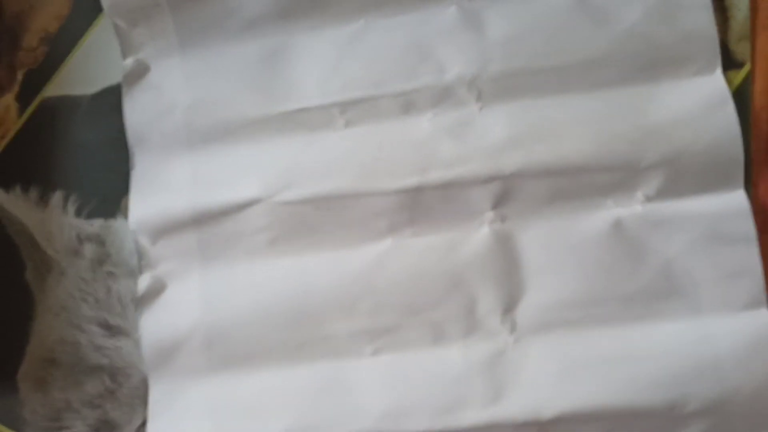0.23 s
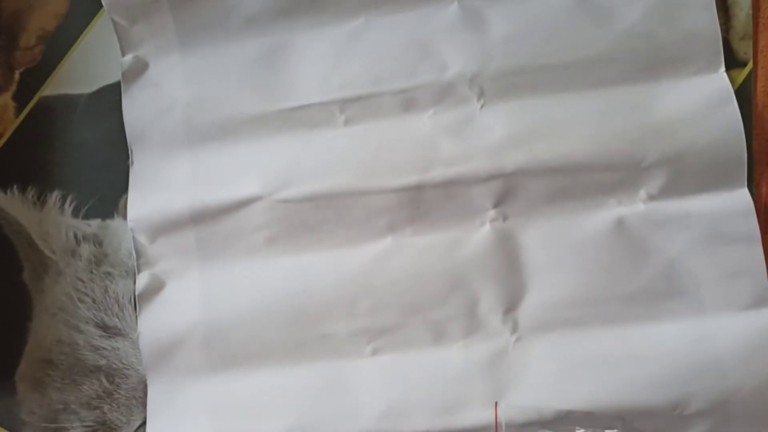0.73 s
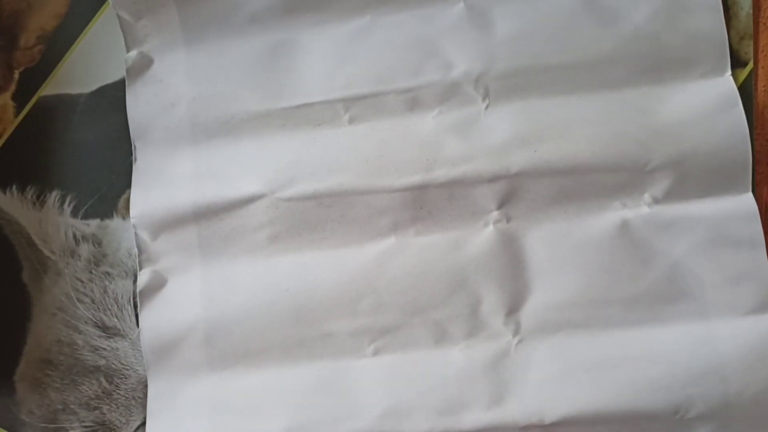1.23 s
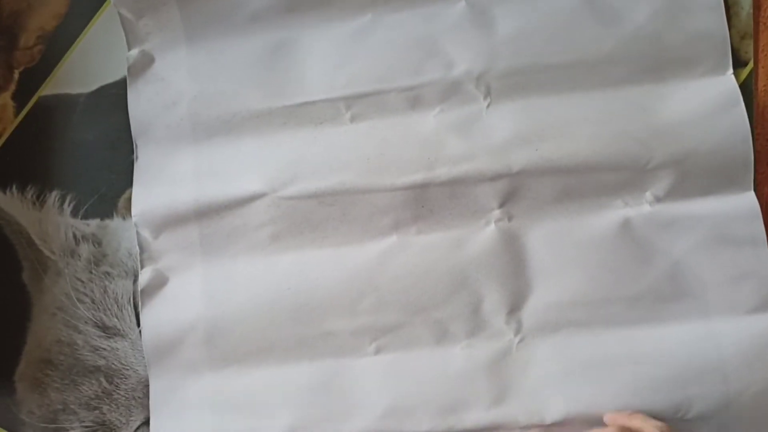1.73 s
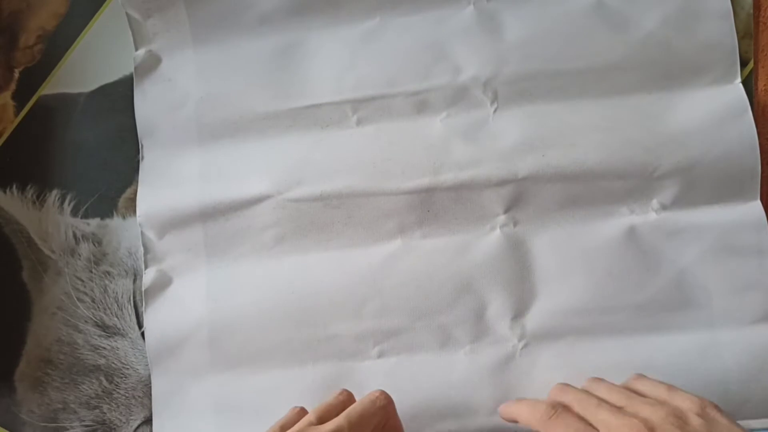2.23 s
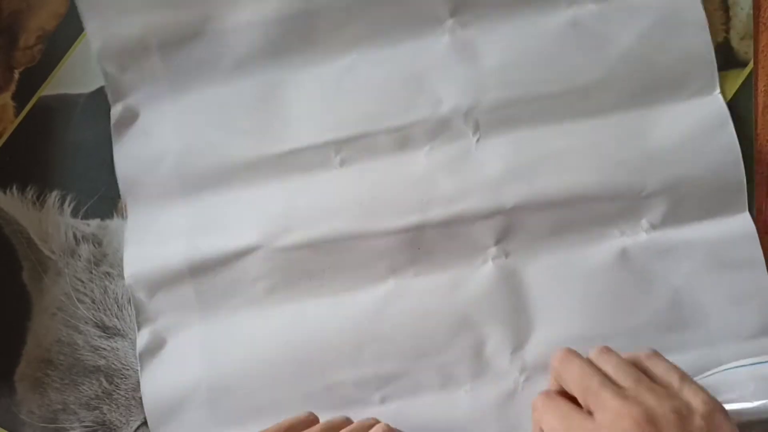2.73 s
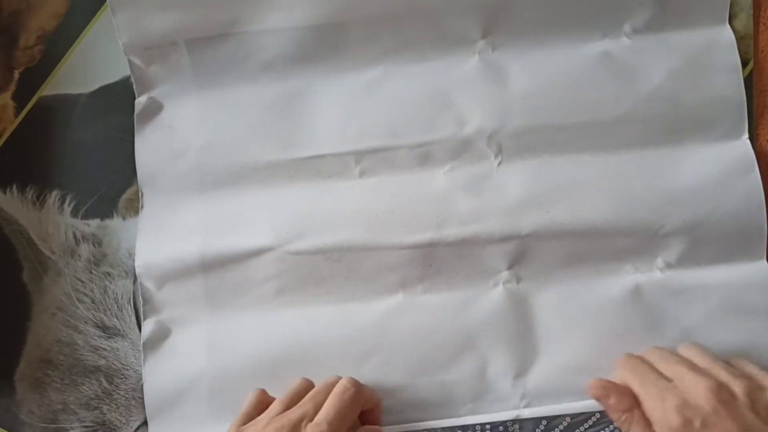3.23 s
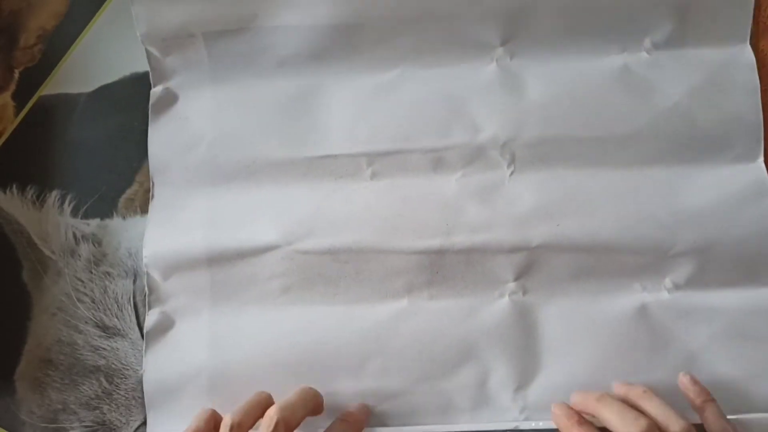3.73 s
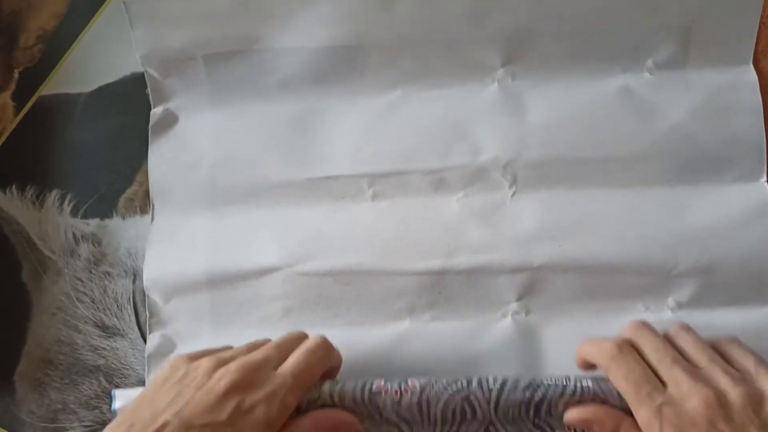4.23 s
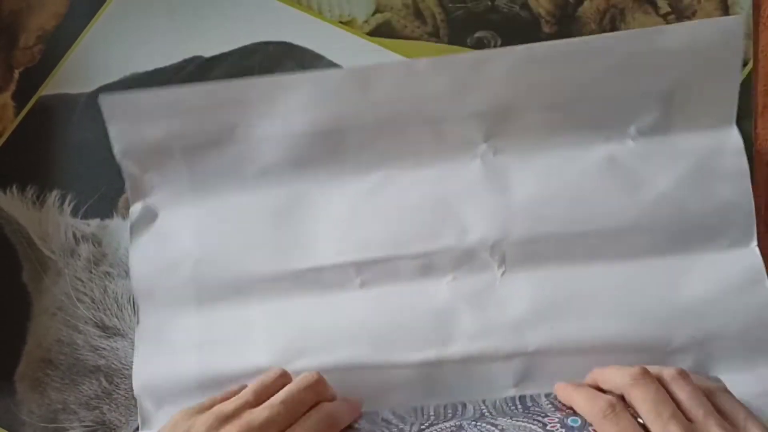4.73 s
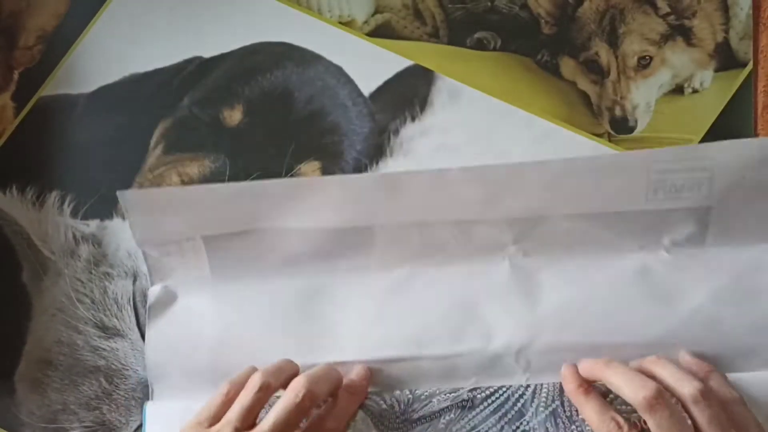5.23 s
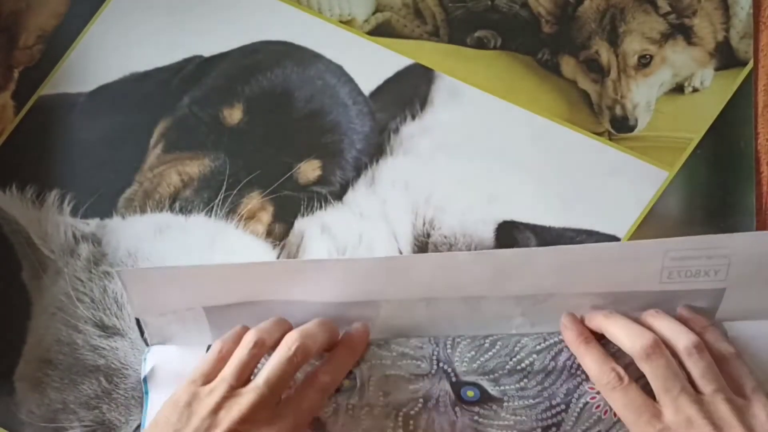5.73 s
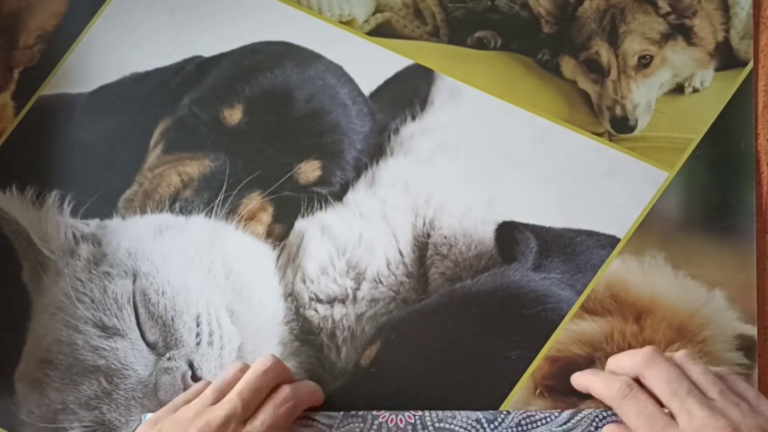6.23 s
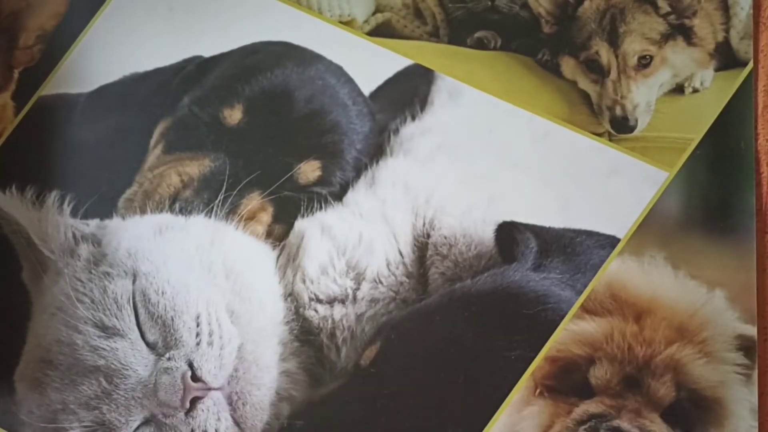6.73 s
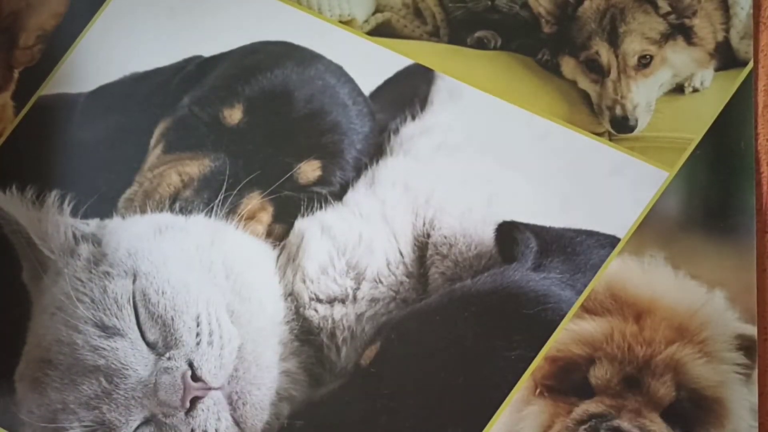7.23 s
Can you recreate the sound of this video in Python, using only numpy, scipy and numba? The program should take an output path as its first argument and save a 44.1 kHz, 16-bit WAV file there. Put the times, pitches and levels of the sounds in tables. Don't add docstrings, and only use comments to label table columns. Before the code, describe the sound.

Close, dry crackling and crunching of a large stiff paper-like sheet being gripped and rolled up on a table, with hollow pops and sharp creases.

```python
import sys
import numpy as np
from scipy import signal
from scipy.fft import rfft, irfft, next_fast_len
from scipy.io import wavfile
from scipy.ndimage import uniform_filter1d, map_coordinates
from numba import njit

SR = 44100
rng = np.random.default_rng(int(sys.argv[2]) if len(sys.argv) > 2 else 0)


def gain_from_db(level_db):
    decades = np.asarray(level_db, float) / 20
    return 10 ** decades


def store_wav(level_fs):
    pcm = np.round(np.clip(np.atleast_2d(level_fs), -1, 1) * 32767)
    wavfile.write(sys.argv[1], SR, pcm.T.astype(np.int16))


N = 330309

# peak in seconds, rise in seconds,
# fall in seconds, strength in dB, sliding over buckling in dB.
MOVES = [(.0, .02, 0.13, -47, 5), (.09, 0.0072, 0.063, -41.5, 14.5), (0.23, 0.013, 0.095, -41, 10),
         (.42, 0.21, 0.43, -46.5, 5.5), (.63, 0.05, 0.058, -39.5, 6), (.736, 0.049, 0.066, -47.5, 3),
         (1.047, 0.022, 0.17, -44, 5.5), (1.23, 0.013, 0.025, -36.5, -3),
         (1.336, 0.014, 0.051, -39.5, -2), (1.43, 0.044, 0.041, -51, -14),
         (1.583, 0.062, 0.038, -36, -1), (1.7, 0.29, 0.036, -48, 5), (1.84, 0.14, 0.21, -38.5, -2.5),
         (2.105, 0.11, 0.13, -38.5, 1.5), (2.04, 0.052, .05, -42, 0), (2.251, 0.016, 0.049, -42.5, 9),
         (2.4, 0.14, 0.13, -47, -7), (2.592, 0.073, 0.084, -37.5, 0.5),
         (2.77, 0.085, 0.084, -41.5, 5.5), (2.89, 0.56, 0.04, -49, -11),
         (3.19, 0.31, 0.11, -47, -5.5), (3.234, 0.0067, 0.028, -29.5, -4),
              (3.265, 0.042, 0.11, -41, -3.5), (3.41, 0.25, 0.015, -48.5, -13),
              (3.48, 0.04, 0.088, -42.5, -7.5), (3.615, 0.034, 0.079, -40.5, -0.5),
              (3.767, 0.023, 0.026, -41, -11), (3.847, 0.064, 0.021, -42, -1.5),
              (4.22, 0.34, 0.34, -43.5, 2.5), (4.419, 0.058, 0.031, -43, 1),
              (4.79, 0.078, 0.14, -42.5, 2.5), (4.89, 0.056, 0.031, -48, -1),
              (5.005, 0.061, 0.068, -40.5, 0), (5.1, 0.03, 0.02, -47.5, -16),
              (5.291, 0.1, 0.042, -50.5, -10.5), (5.39, 0.043, 0.13, -48, 4.5),
              (5.72, 0.38, 0.2, -60.5, -11), (5.84, 0.041, 0.03, -57.5, 21), (5.94, 0.051, 0.07, -53, -10),
              (6.06, 0.03, 0.052, -46, 7), (6.13, 0.063, 0.1, -48, 25), (6.26, 0.11, 0.077, -57.5, -10),
              (6.605, 0.075, 0.15, -46, 0), (6.765, 0.071, 0.074, -52, 6), (7.2, 0.36, 0.084, -64.5, 7)]
# time in seconds, strength in dB, sliding over buckling in dB.
CREEP = [(0, -63.5, -14), (.9, -51, 8), (2.5, -52.5, 2), (3.05, -55.5, 5), (4.58, -53.5, -11.5),
         (5.6, -61, 14), (6.4, -67, -4), (7.49, -82, 6)]
# time in seconds, fibre drag in dB, slack in dB.
HOLD = [(0, 5, -1), (.45, 3.5, 1), (.8, 0.7, -7), (1.1, 5.5, 3.5), (1.6, 3, -4.5), (1.85, -1, -5),
        (2.1, 4, -4.5), (2.6, -2, -2), (3.2, -8, -7.5), (3.6, -0.5, 0), (3.9, -2, -1.5), (4.2, -11, 1),
        (4.6, -2.5, -2), (5.0, 2, -0.5), (5.4, -2, 4.5), (5.9, 2, 4), (6.4, 3, 6.5), (7.1, -4, 0)]
# peak in seconds, peak level in dB.
FLAPS = [(1.175, -45), (2.041, -36), (4.2, -57), (5.72, -57.5), (6.05, -57), (6.27, -60.5), (6.56, -58)]
# frequency in Hz, density in dB per Hz.
SLIDE_SPECTRUM = [(300, -28), (1500, -4), (3000, -3.5), (8000, -6), (17000, -9.5)]
# start in seconds, peak in dB, pitch in Hz,
# rise in ms.
POPS = [(0.0814, -20.5, 1920, 0.47), (0.2302, -23.5, 1970, 4.1), (0.2797, -26.5, 2090, 0.56),
        (0.442, -23.5, 1820, 1.24), (0.581, -21, 2170, 0.6), (0.654, -24, 1430, 2.7),
        (1.0813, -25.5, 1580, 2), (1.1402, -21.5, 1440, 0.63), (1.1665, -21, 1340, 4.1),
        (1.2267, -28, 1270, 1.46), (1.3213, -19.5, 1820, 0.74), (1.5709, -19, 940, 1.02),
        (1.6454, -25, 1130, 1.14), (1.876, -26, 1370, 0.97), (1.9547, -27.5, 1300, 7.9),
        (1.9927, -24.5, 1270, 1.66), (2.0121, -20.5, 1040, 2.4), (2.022, -14, 1270, 1.8),
        (2.037, -15, 1100, 1.55), (2.0465, -13.5, 1310, 5.4), (2.065, -15, 1160, 1.84),
        (2.083, -16, 1036, 2.05), (2.1391, -22.5, 1250, 1.9), (2.1502, -16, 1190, 1.03),
        (2.201, -22, 930, 1.47), (2.2431, -21, 1080, 2.2), (2.3542, -23.5, 2160, 2.7),
        (2.3906, -25, 1220, 2.15), (2.5532, -22.5, 1340, 1.2), (2.6032, -25, 1240, 3.6),
        (2.6912, -18.5, 1980, 0.45), (2.79, -24.5, 1540, 1.1), (2.854, -28, 1230, 0.73),
             (2.886, -23, 1380, 5.5), (2.9009, -25, 1120, 1.86), (3.0372, -27.5, 1350, 1.8),
             (3.2096, -23, 1510, 1.3), (3.2318, -7, 1240, 2.66), (3.2397, -17, 1360, 3.8),
             (3.3205, -21, 1010, 1.95), (3.5012, -28.5, 1170, 3.5), (3.8237, -34, 2040, 1.5),
             (3.9488, -20.5, 1060, 1.6), (4.1377, -27.5, 980, 0.49), (4.2434, -26, 980, 1.42),
             (4.259, -25.5, 1070, 0.56), (4.292, -32, 2550, 5.2), (4.344, -22, 1050, 1.25),
             (5.1, -28, 1680, 6.8), (5.1858, -34, 1540, 1.2), (5.293, -34, 1420, 1.1),
             (5.3356, -31, 1200, 1.13), (5.6836, -38, 1300, 2.3), (5.7914, -29.5, 1270, 0.61),
             (5.917, -30, 1180, 1.5), (6.139, -33, 2070, 0.36), (6.3297, -35.5, 834, 0.5),
             (6.9626, -39, 890, 0.72), (7.3528, -45, 790, 1.3)]
# start in seconds, peak in dB, pitch in Hz,
# rise in ms.
MORE_POPS = [(0.204, -34, 2000, 1.2), (0.249, -37, 1760, 1), (0.342, -31, 2150, 1.2),
             (0.489, -27.5, 1880, 1.1), (0.601, -32, 1150, 0.87), (0.611, -26, 1230, 1.2),
             (0.665, -23, 2130, 1.3), (0.774, -31.5, 1850, 1.4), (0.855, -33.5, 1800, 1.5),
             (1.07, -31, 1610, 0.64), (1.116, -29, 1000, 1.04), (1.219, -25, 1330, 1.24),
             (1.266, -28, 1780, 0.89), (1.339, -19.5, 1440, 1.46), (1.539, -28, 1280, 0.61),
             (1.579, -19.5, 1040, 1.2), (1.844, -24, 1280, 1.1), (2.094, -21, 1530, 1.5),
             (2.119, -23, 1010, 1.3), (2.193, -29.5, 900, 0.92), (2.457, -30, 2060, 1.5),
             (2.506, -32.5, 1070, 1), (2.623, -32, 1170, 1.1), (2.842, -25, 1490, 0.58),
             (3.156, -32, 1450, 1.6), (3.2146, -29, 1250, 1.63), (3.2287, -12, 1250, 1.77),
             (3.398, -28, 970, 1.1), (3.596, -35, 980, 1.3), (3.919, -28.5, 1200, 1.4),
             (3.987, -32.5, 1970, 1.1), (4.28, -31, 1140, 1.4), (4.331, -31, 1080, 1.25),
             (4.482, -31, 2140, 1.7), (4.648, -37, 1119, 1.2), (4.736, -34, 1910, 0.82),
             (5.361, -38, 1670, 1.2), (5.895, -36, 1170, 1.2), (6.024, -42.5, 746, 1.5),
             (6.042, -32.5, 1940, 1.1), (6.49, -46, 636, 1.05), (6.518, -42, 676, 1.6),
             (6.863, -44.5, 720, 1.3), (6.938, -48, 732, 0.96)]
# start in seconds, peak in dB, pitch in Hz, rise in ms.
BUMPS = [(1.39, -36, 129, 7.5), (1.855, -33.5, 182, 6.5), (3.994, -36, 167, 8.5)]
# start in seconds, peak in dB, pitch in Hz, rise in ms.
MORE_BUMPS = [(.265, -40, 139, 8), (.49, -43, 230, 8.7), (1.169, -35.5, 314, 3.9), (1.929, -46, 112, 11),
              (4.3, -40, 110, 7.5), (5.9, -48, 302, 6.2), (6.38, -50, 320, 5)]
# start in seconds, peak in dB, left over
# right in dB.
SNAPS = [(0.0015, -31.5, -9), (0.028, -35, 8), (0.04, -30, -5), (0.0807, -26, 0), (0.2321, -25.5, -3),
         (0.2398, -24.5, -2.5), (0.2965, -30, 7), (0.302, -23.5, -4), (0.392, -30, 3),
         (0.4254, -25, -5), (0.441, -30, 4), (0.4644, -26, -3), (0.582, -30, -4), (0.6533, -26.5, -3),
         (0.6582, -31, 6), (0.7385, -25, -5), (0.855, -38.5, 12), (1.1658, -32, 8),
         (1.2663, -31.0, -1), (1.3151, -29, -3), (1.321, -33, -3), (1.335, -26.5, -4),
         (1.3745, -30.5, 2), (1.5895, -34.5, -1), (1.5417, -24, -6), (1.875, -27, 3),
         (2.0271, -30, -1), (2.0842, -30, 5), (2.138, -22, -3), (2.1977, -26, 0), (2.6915, -30.5, -7),
         (2.887, -33, 1), (3.23, -29, 13), (3.892, -39, -4), (3.969, -36, 2), (3.9773, -35, -8),
              (4.004, -33.5, 3), (4.027, -42, -6), (4.049, -32, 1), (4.11, -33, 5), (4.1327, -29.5, 0),
              (4.155, -24, 0), (4.1865, -29, 3), (4.211, -29.5, 6), (4.238, -33, 11), (4.261, -27.5, 1),
              (4.293, -31.5, 4), (4.657, -40, -2), (4.671, -39.5, 5), (4.7062, -40, -2), (5.195, -39, 3),
              (5.6085, -45, -10), (6.94, -48, 4)]
# start in seconds, peak in dB, left over right
# in dB.
MORE_SNAPS = [(0.2055, -29, -1.5), (0.2504, -33, -3), (0.3795, -25, -2), (0.5177, -30, -1.5), (0.5437, -31, 6),
              (0.602, -32, -2.0), (0.6114, -30, 0.0), (0.695, -27, -1.0), (0.7253, -20, -1), (0.7665, -24.5, -1),
              (1.0718, -20, -2), (1.2047, -31, 0.5), (1.2494, -30, 8), (1.5184, -25, 7), (1.5584, -30, -1),
              (1.6452, -26.5, 5), (1.7318, -28, 15), (1.7789, -32, -0.5), (1.8024, -24, 2), (2.0364, -15, -0.5),
              (2.0515, -19, -2.5), (2.0654, -25, 0.0), (2.1216, -22, -4.5), (2.232, -26, 1), (2.2613, -29, -7),
              (2.3256, -29, -1.5), (2.3875, -30, 4), (2.4262, -30, 3), (2.584, -22.5, -13), (2.7097, -31, 0.5),
              (2.7706, -21, 2), (2.8436, -29, -1.5), (3.209, -30, -3), (3.2148, -33, -6), (3.4422, -27.5, -9),
              (3.5389, -29, -3), (3.577, -29, -5), (3.7658, -32, 0), (4.0935, -28, -2.0), (4.0764, -33, -3.5),
              (4.222, -22, -1), (4.372, -31, -6), (4.7356, -33, -7), (5.0374, -36, -5), (5.232, -37, -9),
              (5.289, -36, -13), (5.685, -37, -7), (5.9988, -37.5, -4), (6.3265, -38, -5), (6.489, -43, -4),
              (7.352, -49, -2)]
# start in seconds, peak in dB.
SPIKES = [(0.0797, -20), (0.4244, -27), (0.4412, -20), (0.58, -27), (1.3204, -18), (1.5417, -22),
          (2.0263, -21), (4.1316, -15.5), (4.7062, -35), (5.6087, -23.5), (6.9397, -31)]
# middle in seconds, length in seconds,
# start pitch in Hz, end pitch in Hz, level in dB.
RUBS = [(1.05, 0.053, 1250, 1200, -39), (1.43, 0.059, 1210, 1200, -35.5), (3.62, 0.037, 1070, 905, -45),
        (3.77, 0.031, 2060, 2200, -43), (3.845, 0.051, 2090, 2160, -33), (4.42, 0.044, 1040, 860, -35.5),
        (4.428, 0.044, 2170, 1250, -35.5), (6.635, 0.05, 1810, 1200, -47), (6.69, .045, 1100, 770, -53),
        (5.035, 0.055, 1650, 1780, -34.5), (6.14, 0.038, 2100, 2340, -42.5), (6.555, 0.12, 470, 776, -51.5),
        (6.6, 0.048, 1680, 2230, -42), (6.74, 0.092, 910, 1300, -45)]
# start in seconds, length in seconds,
# start pitch in Hz, end pitch in Hz, level in dB.
SQUEAKS = [
    (4.967, 0.024, 875, 900, -36),
    (4.989, 0.024, 1002, 1060, -34),
]
# multiple of the pitch, level in dB.
SQUEAK_TONES = [(1, 0), (2, -1.5), (3, -9)]
# frequency in Hz, width in Hz, boost in dB.
TABLE_MODES = [(331.5, 16, 2), (423, 14, 3.5), (719, 7.5, 0.5)]
# frequency in Hz, time to fall 60 dB in seconds.
ROOM_DECAY = [(200, 0.26), (1500, 0.37), (6000, 0.11), (15000, 0.16)]
# frequency in Hz, density in dB per Hz.
HUM_SPECTRUM = [(15, -68), (25, -29), (53, -21.5), (74, -7), (97, -1.5), (161, -2.5), (217, -7.5),
                (5000, -34), (14000, -36)]
# frequency in Hz, response in dB.
LEFT_PORT = [(30, -3), (100, -6), (3550, 1.5), (3800, -2), (5000, -2.5), (6800, 4.5), (6950, -1.5),
             (7500, 3), (9500, -3), (11500, -9), (11700, -4), (15600, -7.5)]
# frequency in Hz, response in dB.
RIGHT_PORT = [(30, 2), (100, -4.5), (3500, -0.5), (3800, -3.5), (6800, -2), (6950, -7.5), (9000, -5.5),
              (11500, 2), (11700, 8.5), (13500, 5), (15600, -1)]


def rustle():
    flapping, crunching, scraping, sliding = effort()
    jerk_db = .8 * wobble(45, np.arange(N) / SR)
    flap = grains(jerk_db, count=2500, centre_hz=383.0, spread=0.39, drift=0.044, cycles=1.1,
                  scatter_db=2.0, clump_db=0.8, width_s=6e-5)
    crunch = grains(jerk_db, count=3200, centre_hz=1200, spread=0.23, drift=0.1, cycles=2.74,
                    scatter_db=2, clump_db=3.0, width_s=9e-5)
    scrape = grains(jerk_db, count=8000, centre_hz=2360, spread=0.237, drift=0.095, cycles=5.5,
                    scatter_db=3.5, clump_db=2.5, width_s=1.2e-4)
    crackle = grains(jerk_db, count=24000, centre_hz=9800, spread=0.467, drift=0.033, cycles=4.6,
                     scatter_db=9.0, clump_db=2.0, width_s=0.0001)
    ticks = grains(jerk_db, count=2500, centre_hz=2450, spread=0.56, drift=0.027, cycles=0.56,
                   scatter_db=5.0, clump_db=0.0, width_s=0.0001)
    hiss = unit(gain_from_db(jerk_db) * rush(SLIDE_SPECTRUM, alike=0.24, patchy_db=2.5))
    buckling = gain_from_db(-0.5) * flapping * flap + gain_from_db(-2.5) * crunching * crunch
    fibres = gain_from_db(-3.0) * scraping * (scrape + gain_from_db(-2.5) * ticks)
    return buckling + fibres + sliding * (gain_from_db(-0.5) * hiss + gain_from_db(-6.5) * crackle)


def effort():
    t = np.arange(0, N / SR + .002, .002)
    s, rise_s, fall_s, db, slides_db = np.transpose(MOVES)
    creep_db, creep_slides_db = read_columns(CREEP, t)

    def strength(share):
        moving = moves(t, s, rise_s, fall_s, db + share * slides_db)
        return np.hypot(moving, gain_from_db(creep_db + share * creep_slides_db))

    crunch, scrape, slide = strength(-.55), strength(-.1), strength(.45)
    flap_s, flap_db = np.transpose(FLAPS)
    swings = moves(t, flap_s, 0.049, 0.068, flap_db)
    flap = np.hypot(swings, gain_from_db(-12.5) * uniform_filter1d(crunch, size=60))
    drag, slack = [gain_from_db(column_db) for column_db in read_columns(HOLD, t)]
    return [np.interp(np.arange(N) / SR, t, g) for g in (slack * flap, crunch, drag * scrape, slide)]


def moves(t, peak_s, rise_s, fall_s, db):
    late = t - peak_s[:, None]
    loss = np.where(late < 0, -late / np.abs(rise_s)[..., None], late / np.abs(fall_s)[..., None])
    level_db = db[:, None] - 12 * loss ** 1.28
    return np.sqrt(np.sum(gain_from_db(level_db) ** 2, axis=0))


def grains(jerk_db, count, centre_hz, spread, drift, cycles, scatter_db, clump_db, width_s):
    s = rng.uniform(0, N / SR, count)
    z = rng.standard_normal((count, 3))
    size_db = scatter_db * np.minimum(rng.exponential(1, count), 3)
    gain = gain_from_db(size_db + clump_db * wobble(40, s) + jerk_db[(s * SR).astype(int)])
    tension = spread * z[:, 0] + drift * wobble(20, s)
    hz = np.clip(centre_hz * np.exp(tension), 60, .4 * SR)
    side = 0.53 * wobble(12, s) + 1.0 * z[:, 1]
    gain *= np.sign(z[:, 2]) * np.sqrt(hz / centre_hz)
    lag_s = np.clip(width_s * side, -3e-4, 3e-4)
    return unit(rings(s, gain, hz, cycles, 0.35, 27000 * width_s * side, lag_s))


def pops(rows, gain_db, count=7):
    s, db, hz, rise_ms = np.transpose(rows)
    db = db + gain_db
    side = rng.standard_normal(len(s))
    swell_cycles = np.maximum(0.00062 * rise_ms * hz, .3)
    ring = rings(s, gain_from_db(db - 4.5), hz, 2.3, swell_cycles, 1.8 * side, 4e-5 * side)
    thump = rings(s, gain_from_db(db - 25.0), 0.36 * hz, 1.0, 0.2, 0.296 * side, 0 * side)

    s, db, hz, rise_ms, side = np.repeat([s, db, hz, rise_ms, side], count, axis=1)
    z = rng.standard_normal((len(s), 3))
    late_s = rng.uniform(0, 1, len(s)) ** 1.436 * (0.00148 + 0.00114 * rise_ms)
    pitch = np.clip(1.45 * hz * np.exp(.55 * z[:, 0]), 520, .3 * SR)
    gain = gain_from_db(db - 12.0 + 4.14 * z[:, 1] - 1.05 * abs(np.log2(pitch / hz)))
    spray = rings(s + late_s, gain, pitch, 1.9, 0.3, 7.1 * side + 1.5 * z[:, 2], 4e-5 * (side + z[:, 2]))
    return ring + thump + spray


def snaps(rows, gain_db, lean_db):
    out = np.zeros((2, N + SR))
    t = np.arange(SR // 20) / SR
    shape = (1 - np.exp(-t / 0.00019)) * (gain_from_db(-60 * t / 0.0048) + gain_from_db(-18 - 60 * t / 0.069))
    for s, db, pan_db in rows:
        common = rng.standard_normal(len(t))
        apart = rng.standard_normal((2, len(t)))
        gain = gain_from_db(db + gain_db + (pan_db + lean_db) * np.array([[.5], [-.5]]))
        start = round(s * SR)
        out[:, start:start + len(t)] += gain * shape * (0.54 * common + 1.71 * apart)
    return signal.sosfilt(signal.butter(4, 3600 / SR * 2, "high", output="sos"), out[:, :N])


def spikes():
    s, db = np.transpose(SPIKES)
    return rings(s, gain_from_db(db + 2.0), 8500 + 0 * s, 0.96, 0.41, 0 * s, 0 * s)


def rubs(count=24):
    middle, length, start_hz, end_hz, db = np.repeat(RUBS, count, axis=0).T
    part = rng.uniform(0, 1, len(db))
    z = rng.standard_normal((len(db), 3))
    hz = (start_hz + part * (end_hz - start_hz)) * np.exp((0.024 + 0.73 * length) * z[:, 0])
    gain = gain_from_db(db + 1.5 * z[:, 1]) * np.sin(np.pi * part)
    return rings(middle + length * (part - .55), gain, hz, 5.0, 2.0, 2.3 * z[:, 2], 4e-5 * z[:, 2])


def squeaks():
    out, t = np.zeros(N), np.arange(N) / SR
    waver, flutter_db = 0.036 * wobble(70, t), 1.8 * wobble(66, t)
    for s, length, start_hz, end_hz, db in SQUEAKS:
        on = (t > s) & (t < s + length)
        part = (t[on] - s) / length
        hz = (start_hz + part * (end_hz - start_hz)) * (1 + waver[on])
        phase = 2 * np.pi * np.cumsum(hz) / SR
        tone = sum(gain_from_db(tone_db) * np.sin(k * phase) for k, tone_db in SQUEAK_TONES)
        out[on] += gain_from_db(db + flutter_db[on]) * np.sin(np.pi * part) ** 0.38 * tone
    return out * gain_from_db([[.6], [-.6]])


def on_table(x):
    def response(f):
        modes = sum(gain_from_db(db) * 1j * f * w / (c * c - f * f + 1j * f * w) for c, w, db in TABLE_MODES)
        return (1 + modes) * (1j * f / (1j * f + 110)) ** 2
    return filtered(x, response)


def room(x):
    hz, t, z = signal.stft(rng.standard_normal((2, SR // 3)), SR, nperseg=256)
    fade = gain_from_db(-60 * t / along(ROOM_DECAY, hz)[:, None])
    tail = signal.istft(z * fade, SR, nperseg=256)[1]
    delayed = np.pad(x, ((0, 0), (130, 0)))
    return signal.fftconvolve(delayed, tail / np.linalg.norm(tail[0]), axes=1)[:, :N]


def hum():
    return gain_from_db(-58.5) * rush(HUM_SPECTRUM, alike=0.31, patchy_db=0.5)


def rush(spectrum, alike, patchy_db):
    z = signal.stft(rng.standard_normal((2, N)), nperseg=256)[2]
    field = rng.standard_normal(z.shape[1:])
    field = uniform_filter1d(uniform_filter1d(field, size=8, axis=0), size=8, axis=1)
    noise = signal.istft(z * gain_from_db(patchy_db * unit(field)), nperseg=256)[1][:, :N]
    a, b = filtered(noise, lambda hz: gain_from_db(along(spectrum, hz)))
    turn = np.arccos(np.clip(alike, 0, 1)) / 2
    return unit(np.array([np.cos(turn) * a + np.sin(turn) * b, np.cos(turn) * a - np.sin(turn) * b]))


def rings(s, gain, hz, cycles, rise, pan_db, lag_s):
    out = np.zeros((2, N))
    for port, sign in enumerate((.5, -.5)):
        start = (s - sign * lag_s) * SR
        add(out[port], start, gain * gain_from_db(sign * pan_db), hz / SR, float(cycles), rise + 0 * s, .35, .6)
    return out


@njit
def add(out, start, gain, step, cycles, rise, attack, jump):
    for g in range(len(start)):
        first = max(int(np.ceil(start[g])), 0)
        spin = np.exp(2j * np.pi * step[g])
        fade = np.exp(-step[g] / cycles)
        phasor = gain[g] * np.exp(2j * np.pi * (first - start[g]) * step[g])
        for i in range(first, min(first + int((rise[g] + 5 * cycles) / step[g]), len(out))):
            turns = (i - start[g]) * step[g]
            swell = min(jump + (1 - jump) * turns / rise[g], 1)
            out[i] += phasor.imag * min(turns / attack, 1) * swell
            phasor *= spin * fade if turns > rise[g] else spin


def wobble(rate, at):
    return map_coordinates(rng.standard_normal(int(N * 80 / SR) + 4), [at * min(rate, 79)])


def read_columns(rows, t):
    s, *columns = np.transpose(rows)
    return [np.interp(t, s, column) for column in columns]


def unit(x):
    return x / np.sqrt(np.mean(x ** 2) + 1e-20)


def along(points, hz):
    f, v = np.transpose(points)
    return np.interp(np.log(hz + 1), np.log(f + 1), v)


def filtered(x, response):
    m = next_fast_len(N + 8192)
    return irfft(rfft(x, m) * response(np.fft.rfftfreq(m, 1 / SR)), m)[..., :N]


def scene():
    sheet = on_table(rustle())
    panels = pops(POPS + BUMPS, gain_db=-1) + pops(MORE_POPS + MORE_BUMPS, gain_db=0.0)
    creases = snaps(SNAPS, gain_db=4.0, lean_db=3.0) + snaps(MORE_SNAPS, gain_db=-5, lean_db=4)
    events = on_table(panels + rubs() + squeaks()) + creases + spikes()
    return events + sheet + room(gain_from_db(-9.0) * events + gain_from_db(-12.5) * sheet) + hum()


def roll_off(x):
    return signal.sosfilt(signal.butter(12, 16980, fs=SR, output="sos"), x)


def record(dry):
    top_hz, edge_hz, skirt_hz, open_s = 15800, 16600, 150, .004

    def below(hz, limit_hz):
        return np.clip((limit_hz - hz) / skirt_hz + .5, 0, 1)

    def colour(hz):
        return gain_from_db([along(LEFT_PORT, hz), along(RIGHT_PORT, hz)])

    spike_s = np.transpose(SPIKES)[0]
    opened = moves(np.arange(N) / SR, spike_s, open_s, open_s, np.zeros(len(SPIKES)))
    steady = filtered(dry, lambda hz: colour(hz) * below(hz, top_hz))
    top = opened * filtered(dry, lambda hz: colour(hz) * (below(hz, edge_hz) - below(hz, top_hz)))
    return roll_off(steady + top)


dry = scene()
out = record(dry)
store_wav(out)
```